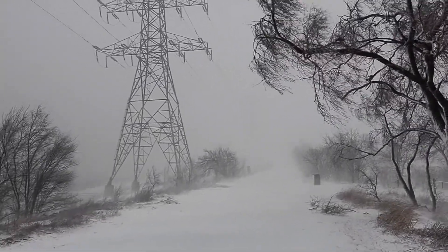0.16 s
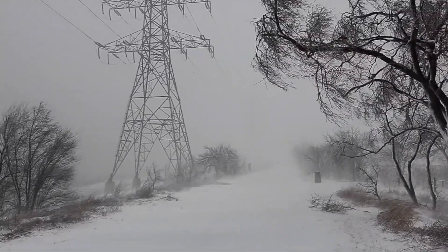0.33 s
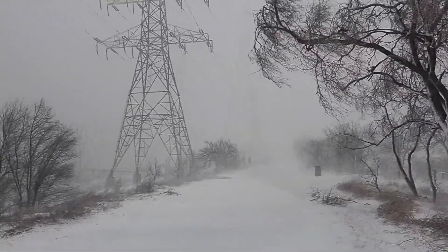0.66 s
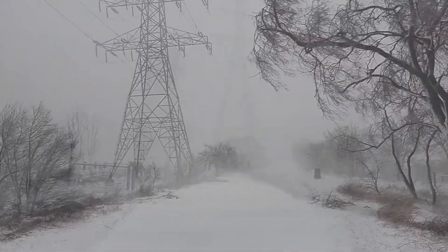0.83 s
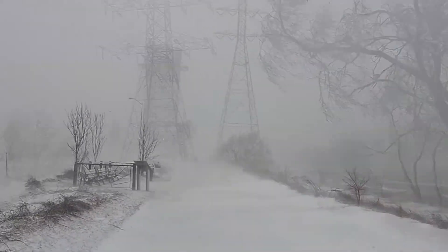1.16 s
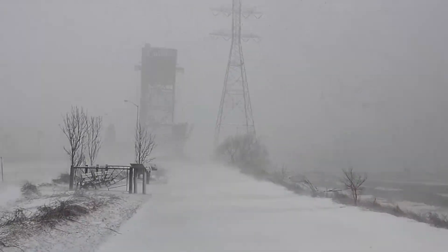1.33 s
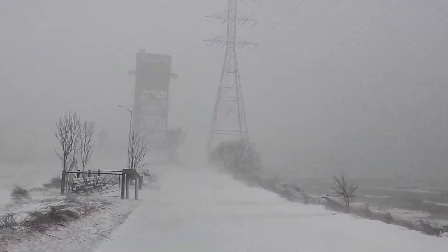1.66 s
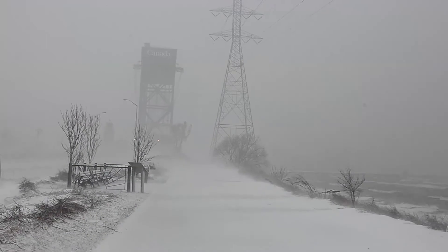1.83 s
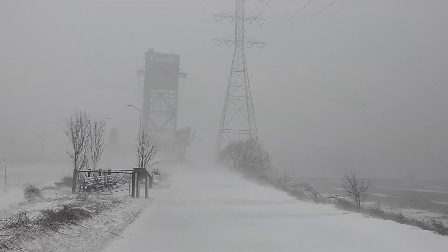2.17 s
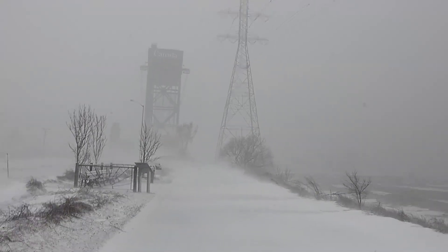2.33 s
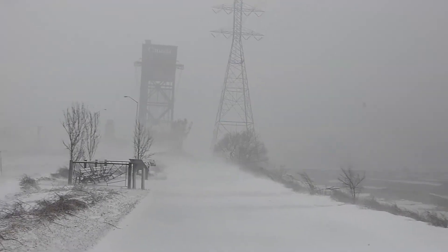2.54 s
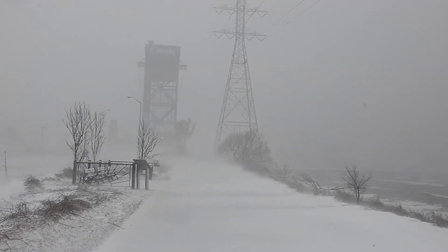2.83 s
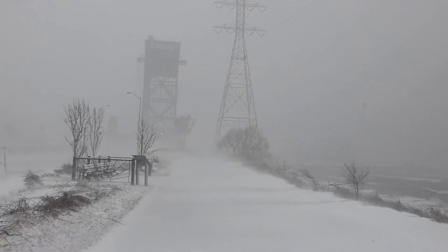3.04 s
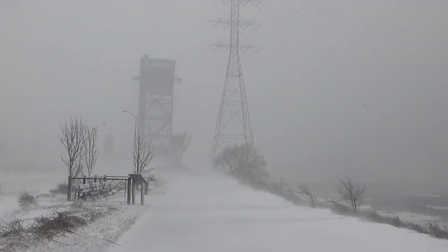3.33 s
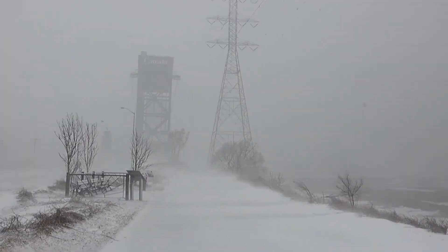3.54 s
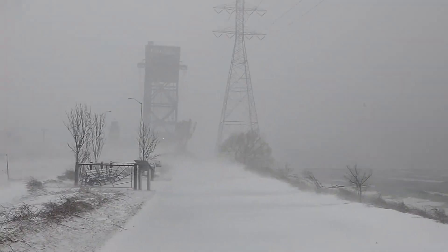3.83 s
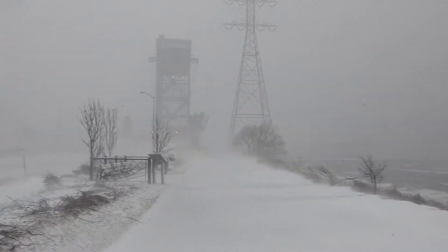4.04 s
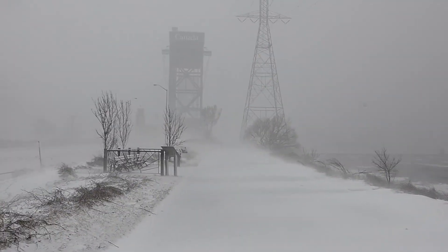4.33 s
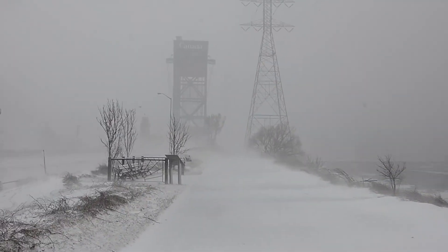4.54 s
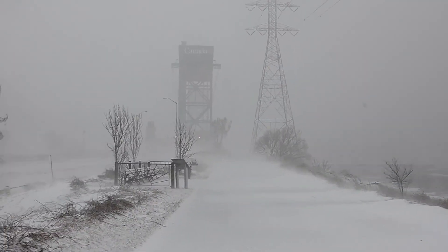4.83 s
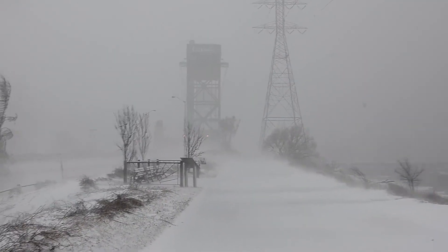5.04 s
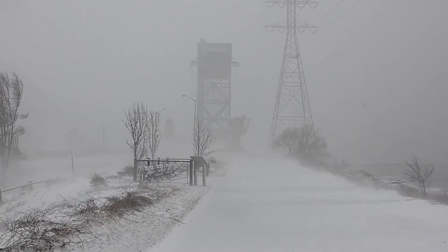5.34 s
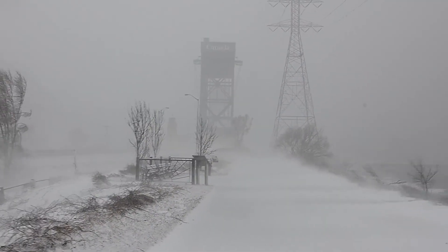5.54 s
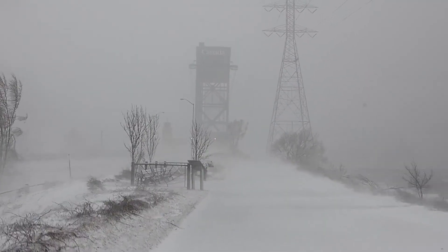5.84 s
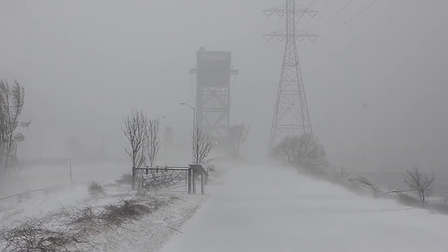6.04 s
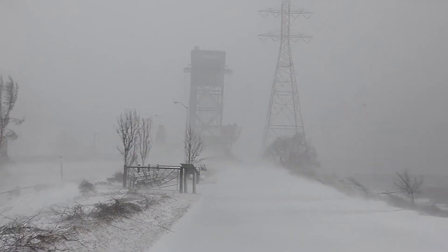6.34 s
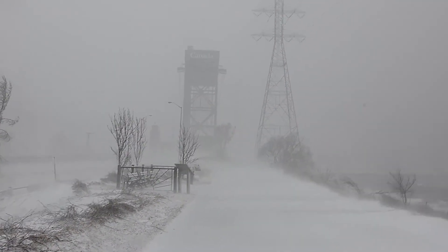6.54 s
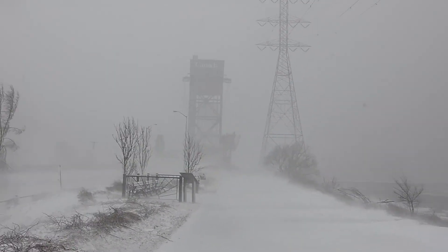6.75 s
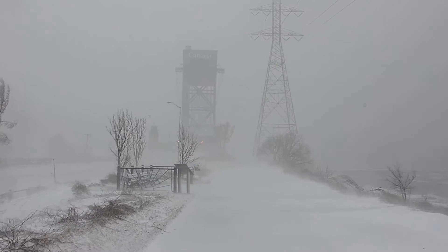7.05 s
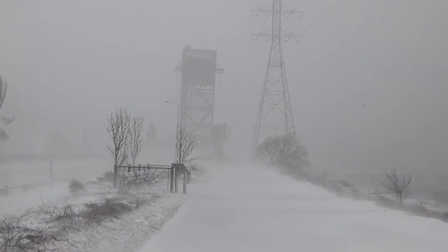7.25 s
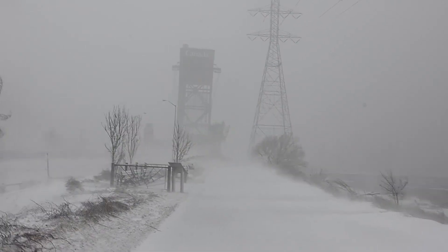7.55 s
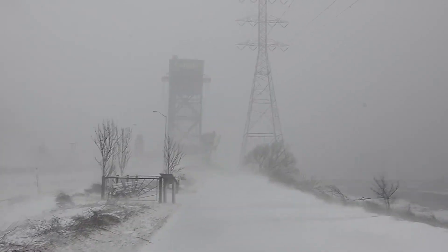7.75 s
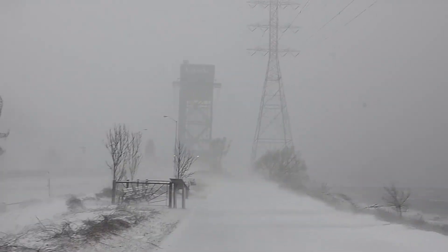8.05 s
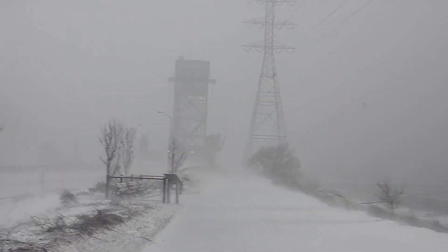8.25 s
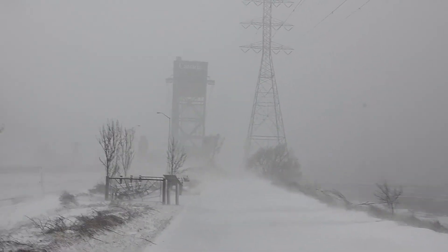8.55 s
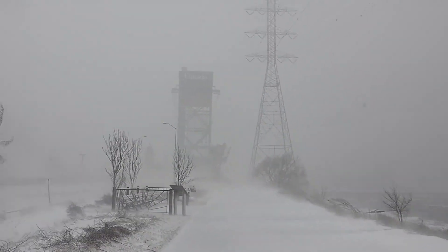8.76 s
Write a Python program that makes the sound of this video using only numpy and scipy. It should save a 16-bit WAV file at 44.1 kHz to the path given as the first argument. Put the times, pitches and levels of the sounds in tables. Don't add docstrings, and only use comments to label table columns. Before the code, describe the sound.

Heavy, overloaded wind roar batters the microphone on an open snowy shore, over a faint hissing gale and scattered dry pellet clicks.

```python
import sys
import numpy as np
from scipy import signal
from scipy.fft import rfft, irfft, next_fast_len
from scipy.io import wavfile

SR = 44100
rng = np.random.default_rng(int(sys.argv[2]) if len(sys.argv) > 2 else 0)


def boost(x):
    u = np.asarray(x, float) / 20
    return 10 ** u


def file_out(sig):
    cols = np.atleast_2d(sig).T
    lim = np.clip(cols, -1, 1)
    pcm = np.round(lim * 32767).astype(np.int16)
    wavfile.write(sys.argv[1], SR, pcm)


N = 392931

# start in seconds, force in dB, big eddies over middle ones in dB,
# left over right in dB.
EDDIES = [(0.0, -18, -7, 6), (0.37, -17.5, -6, 6), (1.37, -17.5, -12, 3), (2.75, -16, -17.5, 4),
          (3.08, -17.5, -4, 4), (3.15, -18, -12, 4.0), (3.55, -17, -16, 2), (5.34, -16.5, -7, 4.0),
          (5.61, -17.5, 1.5, 5.0), (5.86, -18.5, -13, 6.5), (5.91, -18.5, -10.5, 5.5),
          (7.15, -16, -10.5, 3.5), (7.5, -14, -21, 3.5), (7.69, -18, -2, 3), (8.02, -15.5, -28, 4.5),
          (8.56, -14.5, -13.5, 0.5), (8.86, -17, -25, 3.5), (8.91, -19.5, -2, 0.0)]
# centre in seconds, rise in dB, length in seconds, small eddies over middle in dB.
SURGES = [(0.203, -4, 0.1, 1.5), (0.528, 3.5, 0.095, -1), (0.633, 0.5, 0.21, -0.5), (0.946, -1, 0.089, 1.5),
          (1.126, -4, 0.054, 1), (1.294, 0.5, 0.61, 2.5), (1.588, 2.5, 0.038, 3.5), (1.938, 7.5, .066, -3),
          (2.096, -1, .12, 3), (2.61, -4.5, 0.095, 2), (2.703, 2, 0.066, 0.5), (3.316, -3.5, .1, 3.5),
          (3.553, 3, 0.38, 0), (3.92, 0.5, 0.22, 5), (4.334, 4.5, 0.035, -2), (4.457, 2, 0.26, -5),
          (4.748, 1, 0.29, -3), (5.06, 2, 0.079, -2), (5.585, -3.5, .07, 5), (5.72, 2, .15, -0.5),
          (6.167, 1, 0.12, 3.5), (6.279, -1.5, 0.034, 0), (6.85, 2.5, 0.1, -1), (7.017, -1.5, .18, 0),
          (7.24, 3, 0.09, -2), (7.57, -1, 0.081, 0), (7.826, 2, 0.24, 3), (8.096, 2.5, .15, -2.5),
          (8.326, -2.5, 0.07, 2), (8.8, 0.5, 0.33, 2.5)]
# frequency in Hz, density in dB per Hz.
BUFFET = [(11, -45), (18, -21.5), (103, 0), (146, 1), (287, -2.5), (825, -24), (1400, -37.5), (1820, -55),
          (3080, -120)]


def buffeting(rush_db):
    force, bulk, lean = [c - c.mean() for c in in_time(EDDIES)]
    surges = np.array(SURGES)
    force = force + bells(surges[:, :3])
    fine = bells(surges[:, [0, 3, 2]])
    tumble_db, tumble_per_s = 1.21, 2.05
    big = force + bulk + 3.5 * drift(tumble_per_s)
    middle = force + tumble_db * drift(tumble_per_s)
    small = force + fine - 0.12 * bulk + 0.38 * rush_db
    small = small + tumble_db * drift(tumble_per_s)
    lean = lean + 2 * drift(9.0)
    lumps = np.array([drift(21), drift(10.6)])
    slaps = drift(50)

    def swell_db(hz):
        size = big + between(hz, 40, 144) * (middle - big)
        size = size + between(hz, 190, 410) * (small - middle)
        chance = 0.8 * lumps + 1.63 * between(hz, 120, 500) * slaps + 0.41 * drift(4.9)
        return size + chance + np.array([lean, -lean]) / 2

    half_octaves = 17 * 2 ** np.arange(0, 6.6, .5)
    return boost(-14.5) * turbulence(BUFFET, half_octaves, swell_db)


# start in seconds, peak at the left port in dB.
TAPS = [(0.0543, -5.5), (0.0642, -4), (0.1014, -9), (0.1339, -17), (0.1644, -16), (0.1886, -11),
        (0.1977, -6), (0.2249, -5), (0.2414, -4), (0.2529, -12), (0.2678, 2), (0.2857, -17), (0.3185, -11),
        (0.3681, -4), (0.5572, -1.5), (0.5878, -3), (0.6113, -7), (0.7031, -14), (0.8095, -15),
        (0.8475, -5), (0.8895, -3.5)]
# frequency in Hz, level in dB, cycles to die away, spread between pellets in dB.
FLANK = [(2300, -4, 3.5, .5), (4500, -18, 5.0, 5.0), (7400, -32, 7.0, 6.0)]


def taps():
    at = [round((s - .0003) * SR) for s, db in TAPS]
    peaks_db = np.array(TAPS)[:, 1]
    chance = rng.standard_normal((len(TAPS), 3))
    tick = 0
    for k, (hz, level_db, cycles, spread_db) in enumerate(FLANK):
        clicks = np.zeros(N)
        clicks[at] = boost(peaks_db + level_db + spread_db * chance[:, k])
        tick = tick + ring(clicks, hz, cycles)
    return np.array([tick, -.33 * np.roll(tick, 2)])


# start in seconds, peak in dB, ring in Hz, left over right in dB.
PELLETS = [(0.059, -18.5, 4640, 2), (0.1153, -19, 3960, 0), (0.177, -26, 3800, -4), (0.327, -19, 3700, 0),
           (0.387, -22, 3900, -5), (0.422, -27, 3600, 5), (0.824, -28, 4800, -3), (1.018, -17.5, 3520, 5),
           (1.581, -17, 3970, 9), (1.7257, -25, 4100, 3), (2.0097, -19, 4200, 2), (2.069, -23, 4300, -1),
           (3.285, -25, 4300, 4), (3.31, -10.5, 4200, 9), (3.3524, -16, 3900, -2), (3.4032, -13, 4100, -7),
           (3.4172, -10.5, 4300, 12), (3.4843, -23, 3900, 19), (3.5698, -32, 3600, 8),
           (3.6352, -17, 3900, 3), (3.802, -18, 3700, -7), (4.1946, -20, 3700, -3), (4.2657, -23, 4200, 7),
           (4.3414, -17.5, 4630, -3), (6.176, -17.5, 3700, -9), (6.4951, -18.5, 4100, -1),
           (7.8142, -24, 3600, -8), (7.8954, -22, 3700, 6), (8.436, -17, 3500, 0), (8.6893, -21, 3800, -8)]


def pellets():
    out, click = np.zeros((2, N)), np.eye(1, 300)[0]
    for s, peak_db, hz, lean_db in PELLETS:
        at = round((s - .0002) * SR)
        tick = ring(click, hz, 3.9)
        tick = tick + 0.14 * ring(click, min(1.8 * hz, 10000), 14.0)
        tick = tick + .02 * ring(click, min(3.0 * hz, 12000), 9.0)
        out[:, at:at + 300] += boost(peak_db - 0.7) * left_right(lean_db)[:, None] * tick
    return out


# start in seconds, peak in dB, left over right in dB.
GRAINS = [(0.0947, -44, -2.5), (0.4853, -40, -5.5), (0.5536, -44, -6), (0.5866, -28, 1.0), (0.6804, -41, 3),
          (0.8061, -47, -2), (1.1503, -34, 3), (1.1957, -39, 3), (1.2271, -44, -1), (1.714, -40, 1),
          (2.6444, -40, -6), (3.1602, -41, 1), (3.2844, -44, -2.0), (3.3483, -38, -3.5), (3.4027, -39, 0.5),
          (3.5164, -38, -6), (3.7504, -37, 0.0), (4.8853, -44, -1.0), (5.6002, -36, -2.0),
          (6.7401, -40, -5), (6.7955, -44, -2.0), (6.8977, -43, -2.5), (7.7418, -43, -4), (8.0376, -41, 1)]


def grains():
    s, db, lean_db = np.transpose(GRAINS)
    clicks = strike((s * SR).astype(int), boost(db + 6), lean_db)
    return ring(clicks, hz=8000, cycles=2.5)


# frequency in Hz, density in dB per Hz.
RUSH = [(350, -30), (600, -12.5), (832, -8), (1420, -8.5), (5090, -25.5), (5680, -32.5), (6340, -14.5),
        (9410, -49.5), (12200, -57), (14500, -60), (15600, -93)]


def rush(rush_db, hiss_db):
    flutter = drift(46) + 0.2 * np.array([drift(40), drift(40)])

    def swell_db(hz):
        bright = between(hz, 810, 6000)
        gusts = rush_db + bright * (0.55 * hiss_db - rush_db)
        gusts = gusts + .3 * hiss_db * between(hz, 9000, 14000)
        return gusts + (0.47 + 0.45 * bright) * flutter + 0.88 * drift(23)

    return boost(-32) * turbulence(RUSH, np.geomspace(690, 15700, 12), swell_db)


# frequency in Hz, level in dB, cycles to die away.
CASING = [(2320, 4, 6), (2970, 4, 1.4), (3700, 2, 1.7), (4300, -4, 6.3), (5350, 6.5, 3), (5930, -6.5, 3.9),
          (7420, -2, 5.2), (9420, -9.5, 7.4), (10700, -35, 3.8), (12500, -34, 9.3), (14200, -23, 12.0)]


def sleet(hiss_db):
    per_s = 450 * boost(.9 * hiss_db + 4.0 * drift(30))
    at = np.flatnonzero(rng.random(N) < per_s / SR)
    sizes = boost(5.0 * np.minimum(rng.exponential(1, N), 2.8)) * rng.choice([-1, 1], N)
    leans = 3.5 * rng.standard_normal(N) - 2.5
    dealt = rng.integers(0, len(CASING), N)
    out = 0
    for k, (hz, level_db, cycles) in enumerate(CASING):
        mine = at[abs(dealt[at] - k) <= 1]
        out = out + boost(level_db) * ring(strike(mine, sizes[mine], leans[mine]), hz, cycles)
    force_db = .6 * hiss_db
    return boost(-42.5 + force_db) * rms_one(out)


# centre in seconds, rise in dB, length in seconds.
FLURRIES = [(0.291, 8.5, 0.08), (0.694, 4.5, 0.087), (0.832, 7, 0.11), (1.237, 14.5, 0.057),
            (1.485, 13, 0.01), (1.576, 6.5, 0.038), (1.745, 9, 0.046), (1.96, 4.5, 0.053),
            (2.021, 3.5, 0.077), (2.176, -5, 0.013), (2.656, 9.5, 0.04), (3.18, 5, 0.03), (3.31, 6, 0.17),
            (3.415, 3.5, 0.018), (3.564, 6, 0.074), (3.802, 10.5, 0.14), (4.139, 9.5, 0.024),
            (4.254, 4, 0.067), (4.91, 6.5, 0.14), (5.36, 3.5, 0.054), (5.658, 4.5, 0.1),
            (6.141, 6.5, 0.072), (6.794, 6.5, 0.04), (6.883, 8.5, 0.06), (7.152, 3.5, 0.023),
            (7.246, 1.5, 0.045), (7.684, 11.5, 0.026), (7.783, 6.5, 0.11), (8.443, 6.5, 0.06),
            (8.701, 7.5, 0.065)]


def flurries():
    return bells(FLURRIES) + 2 * drift(12)


# start in seconds, wind strength in dB, snow load in dB.
GALE = [(0.0, -29.5, -52.5), (0.22, -25.5, -51), (1.56, -33, -48), (2.08, -34, -52.5), (3.2, -31.5, -53),
        (3.43, -26.5, -41.5), (3.67, -35, -51.5), (3.77, -33, -51), (4.32, -30.5, -48.5),
        (4.44, -32.5, -50), (5.14, -33, -52), (6.78, -28.5, -50), (6.97, -34.5, -55), (7.2, -31.5, -47),
        (7.4, -40, -53.5), (7.84, -32.5, -52), (7.89, -40, -51.5), (8.91, -37, -54)]


def gale():
    wind_db, snow_db = in_time(GALE)
    flurry_db = flurries()
    rush_db = wind_db + 0.23 * flurry_db
    hiss_db = snow_db + flurry_db
    return rush_db - rush_db.mean(), hiss_db - hiss_db.mean()


# frequency in Hz, in-phase likeness,
# quarter-cycle likeness.
LIKENESS = [(20, -0.4, .1), (45, -0.71, 0.38), (127, -0.31, -0.87), (262, -0.36, -0.35),
            (510, -0.21, 0.075), (990, 0.029, 0.083), (1470, 0.72, 0.33), (2660, 0.4, 0.54),
            (4800, 0.41, 0.0012), (8050, -0.24, -0.073), (10500, 0.081, 0), (13500, -0.9, 0)]


def port_noise():
    size = next_fast_len(N)
    left, own = rfft(rng.standard_normal((2, size)))
    hz = np.arange(len(left)) * SR / size + 1
    alike = at_hz(LIKENESS, hz) + 1j * at_hz(LIKENESS, hz, axis=2)
    own_share = np.sqrt(np.clip(1 - abs(alike) ** 2, 0, 1))
    right = alike * left + own_share * own
    return irfft(np.array([left, right]), size)[:, :N]


# frequency in Hz, left over right in dB.
LEAN = [(22, 12.5), (60, 7), (180, 4), (550, 0), (1650, -3.5), (4970, -2), (15000, 3.5)]


def turbulence(spectrum, edges, swell_db):
    out, white = 0, [port_noise(), port_noise()]
    for k, (low, high) in enumerate(zip(edges, edges[1:])):
        bandpass = signal.butter(2, [low, high], "band", fs=SR, output="sos")
        band = signal.sosfilt(bandpass, white[k % 2])
        hz = np.sqrt(low * high)
        level = boost(at_hz(spectrum, hz) + swell_db(hz))
        out = out + band * level * left_right(at_hz(LEAN, hz))[:, None]
    return rms_one(out)


def ring(clicks, hz, cycles):
    r, w = boost(-60 * hz / (cycles * SR)), 2 * np.pi * hz / SR
    pole = [1, -2 * r * np.cos(w), r * r]
    height = 2 * np.e * (1 - r) * np.sin(w) ** 2
    return signal.lfilter([height], np.convolve(pole, pole), clicks + 1e-18)


def strike(at, sizes, lean_db):
    clicks, gains = np.zeros((2, N + 1)), left_right(lean_db) * sizes
    np.add.at(clicks[0], at + (lean_db < 0), gains[0])
    np.add.at(clicks[1], at + (lean_db >= 0), gains[1])
    return clicks[:, :N]


def bells(rows):
    out, t = np.zeros(N), np.arange(N) / SR
    for s, rise_db, length in rows:
        near = slice(max(int((s - 2 * length) * SR), 0), int((s + 2 * length) * SR))
        out[near] += rise_db * .5 ** ((2 * (t[near] - s) / length) ** 2)
    return out


def drift(rate):
    r = np.exp(-32 * np.pi * rate / SR)
    slow = signal.lfilter([1], [1, -2 * r, r * r], rng.standard_normal(N // 16 + 3002))[3000:]
    return np.interp(np.arange(N) / 16, np.arange(len(slow)), rms_one(slow - slow.mean()))


def in_time(rows):
    s, *columns = np.transpose(rows)
    return [np.interp(np.arange(N) / SR, s, c) for c in columns]


def at_hz(points, hz, axis=1):
    points = np.array(points)
    return np.interp(np.log(hz), np.log(points[:, 0]), points[:, axis])


def between(hz, low_hz, high_hz):
    return np.clip(np.log(hz / low_hz) / np.log(high_hz / low_hz), 0, 1)


def rms_one(x):
    return x / np.sqrt(np.mean(np.atleast_2d(x).mean(0) ** 2) + 1e-20)


def left_right(db):
    return boost(np.array([db / 2, -db / 2]))


def scene():
    rush_db, hiss_db = gale()
    on_casing = taps() + pellets() + grains() + sleet(hiss_db)
    return buffeting(rush_db) + on_casing + rush(rush_db, hiss_db)


# frequency in Hz, width in Hz, depth from 0 to 1.
PORT_NOTCHES = [(5690, 480, .7), (6900, 190, .72)]


def top_cut(x):
    return signal.sosfilt(signal.butter(12, 15720, fs=SR, output="sos"), x)


def record(dry):
    overload = .985
    x = np.clip(dry, -overload, overload)
    for hz, width, depth in PORT_NOTCHES:
        x = x - depth * signal.lfilter(*signal.iirpeak(hz, hz / width, fs=SR), x)
    x = signal.sosfilt(signal.butter(6, 15300, fs=SR, output="sos"), x)
    return top_cut(x)


dry = scene()
out = record(dry)
file_out(out)
```